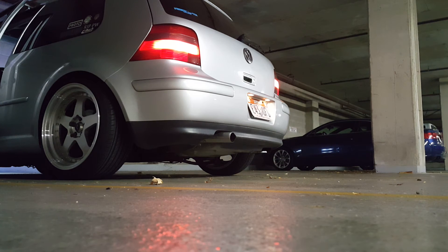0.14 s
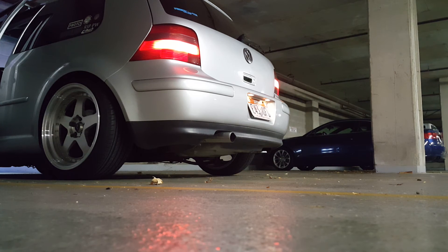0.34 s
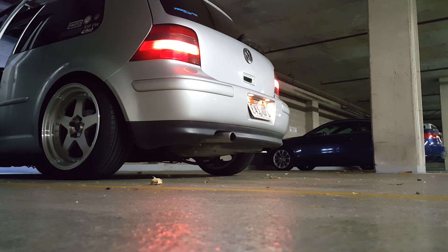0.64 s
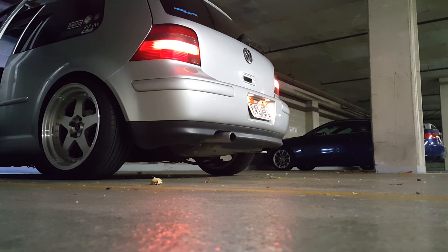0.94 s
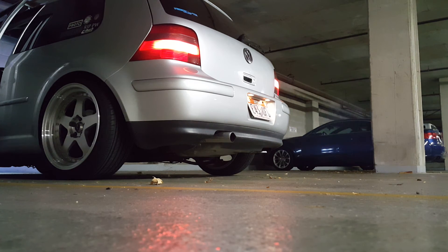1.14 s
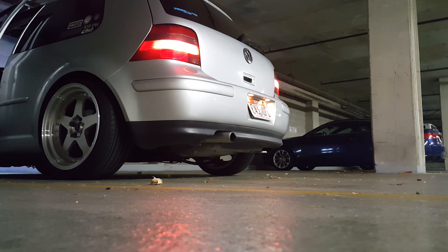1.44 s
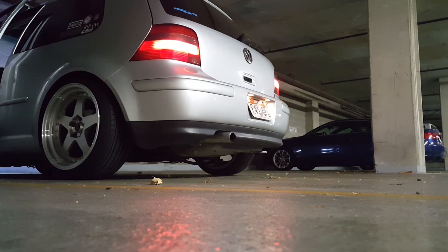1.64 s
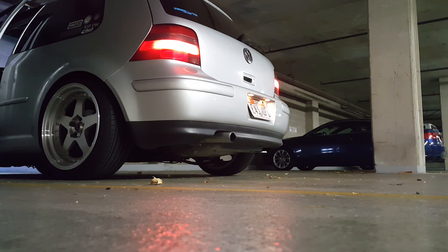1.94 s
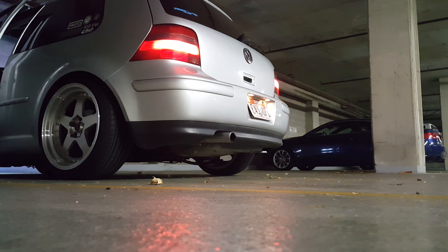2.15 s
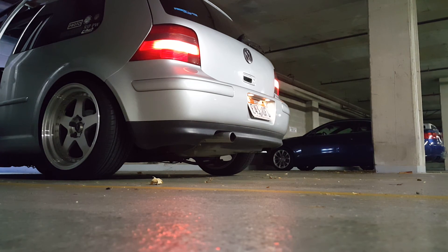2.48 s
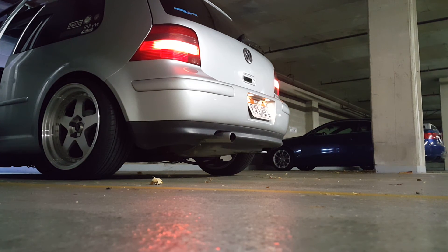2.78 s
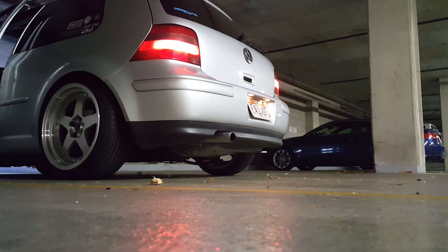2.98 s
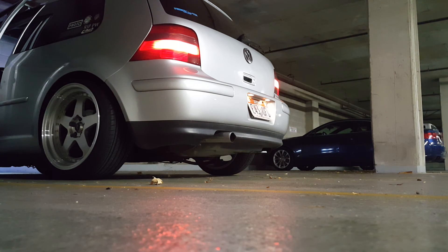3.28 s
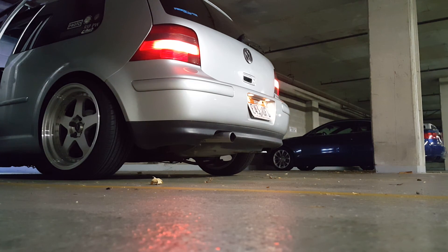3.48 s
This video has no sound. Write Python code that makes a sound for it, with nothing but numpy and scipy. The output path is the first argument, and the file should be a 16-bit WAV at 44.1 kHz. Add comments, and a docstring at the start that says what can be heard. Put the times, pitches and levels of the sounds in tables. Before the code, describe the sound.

Rumbling car exhaust with one quick rev and a falling turbo whistle in a concrete garage.

```python
"""A turbocharged four-cylinder car, blipped in a concrete parking garage, the microphone low behind
its tailpipe. Every firing booms through the pipe and puffs out gas; on throttle the puffs turn into
hard cracks, and now and then unburnt fuel pops. The turbo's breathy whistle spins up with the big
blip and winds down slowly. The hall answers with a long low tail, over a steady rush of its own."""
import sys
import numpy as np
from scipy import signal
from scipy.fft import rfft, irfft, next_fast_len
from scipy.io import wavfile
from scipy.ndimage import map_coordinates

SR = 44100
rng = np.random.default_rng(int(sys.argv[2]) if len(sys.argv) > 2 else 0)


def generate_wav(signal):
    """Clip the signal to [-1, 1] and save it as 16-bit WAV at the path in sys.argv[1]."""
    frames = np.transpose(np.atleast_2d(signal))
    scaled = np.clip(frames, -1, 1) * 32767
    pcm = np.round(scaled).astype(np.int16)
    wavfile.write(sys.argv[1], SR, pcm)


N = 159642

# Engine speed. Each row: time in seconds, firings per second.
FIRING_RATE = [(0.0, 49.79), (0.1, 47.05), (0.24, 46.47), (0.42, 42.41), (0.66, 39.92), (0.79, 38.42),
               (0.87, 42.67), (0.97, 56.76), (1.08, 75.87), (1.15, 88.1), (1.21, 89.48), (1.46, 77.46),
               (1.75, 62.95), (2.07, 48.95), (2.33, 43.97), (2.43, 46.91), (2.63, 48.28), (2.88, 43.5),
               (3.15, 38.5), (3.4, 35.3), (3.62, 34.6)]
# The drone. Each row: time in seconds, then dB before trim for harmonics 1 to 4 of the firing rate.
HARMONIC_LEVELS = [(0.0, -31, -28, -31, -36), (0.18, -32, -10, -23, -29), (0.3, -37, -20, -27, -27),
                   (0.42, -40, -14, -34, -24), (0.65, -41, -19, -27, -17), (0.71, -41, -27, -27, -27),
                   (0.83, -41, -28, -27, -23), (0.89, -42, -12, -26, -23), (0.95, -33, -17, -13, -27),
                   (1.01, -25, -30, -23, -23), (1.13, -23, -12, -18, -20), (1.25, -15, -21, -27, -33),
                   (1.42, -30, -14, -26, -30), (1.6, -26, -23, -30, -32), (1.72, -36, -39, -37, -30),
                   (1.96, -25, -20, -22, -27), (2.02, -29, -16, -18, -37), (2.26, -37, -17, -30, -25),
                   (2.37, -37, -19, -23, -33), (2.43, -34, -13, -17, -23), (2.55, -33, -22, -33, -29),
                   (2.61, -39, -11, -15, -22), (2.91, -39, -15, -31, -26), (3.2, -43, -37, -37, -27),
                   (3.44, -41, -29, -26, -20), (3.62, -42, -27, -24, -28)]
# Trim in dB for each harmonic.
HARMONIC_TRIMS = [-6.5, 0.37, -1, -1]
# Strength in dB of each cylinder.
CYLINDER_DB = [0.85, 0.48, 1.5, -1.8]
# Exhaust flow. Each row: time in seconds, rumble in dB, rasp in dB.
EXHAUST_LEVELS = [(0, -18.5, -25), (.25, -21, -29), (.55, -17, -28.5), (.82, -16.5, -32),
                  (.92, -13.5, -22.5), (1.12, -19.5, -31.5), (1.26, -19.5, -27), (1.5, -22, -27.5),
                  (1.72, -24, -29.5), (1.95, -19.5, -26), (2.3, -18.5, -29.5), (2.58, -14.5, -25.5),
                  (2.72, -18, -30.5), (3.02, -18.5, -32.5), (3.2, -24.5, -33.5), (3.62, -18.5, -33)]
# The turbo. Each row: time in seconds, pitch in Hz, dB before the pipe, width as a share of pitch.
WHISTLE_PATH = [(0, 5150, -35.5, 0.078), (.2, 4596, -34.5, 0.08), (.4, 4187, -37, 0.09),
                (.62, 3800, -34, 0.061), (.8, 3527, -52.5, 0.053), (.9, 3750, -35, 0.28),
                (1.02, 5155, -32, .17), (1.16, 7320, -29.5, 0.13), (1.26, 8600, -45, 0.1),
                (1.5, 7970, -43, 0.15), (1.7, 7040, -48, .07), (1.9, 6330, -38, 0.035),
                (2.15, 5376, -43.5, 0.043), (2.4, 4636, -36, 0.041), (2.6, 4600, -36, 0.095),
                (2.88, 4080, -38.5, .08), (3.02, 3880, -39.5, 0.044), (3.2, 3503, -55, 0.047),
                (3.45, 3100, -38, .035), (3.62, 2900, -42, .035)]
# What the pipe passes of the whistle. Each row: frequency in Hz, gain in dB.
PIPE_GAIN = [(1500, -14.5), (2800, 6), (3080, 6), (3400, -3), (3850, 1.5), (4250, -8), (4700, -3.5),
             (5600, -16), (6400, -9.5), (7300, -11), (8300, -12), (10000, -14.5), (13000, -25.5)]
# Fuel pops. Each row: start in seconds, level in dB, ring in Hz, ring boost in dB.
FUEL_POPS = [(.027, -21, 1300, 13.5), (.232, -23.5, 2900, 10.5), (1.188, -23.5, 12600, 23.5),
             (2.563, -10.5, 550, 17.5), (2.605, -14, 1300, 11)]
# Throttle openings. Each row: start and end in seconds, crack level at each in dB.
THROTTLE_BLIPS = [(0.882, 1.077, -20, -17), (1.11, 1.193, -20.5, -22.5), (2.437, 2.458, -26.5, -29.5),
                  (2.538, 2.594, -26, -30)]
# Tone colours. Each row: frequency in Hz, relative level in dB.
RUMBLE_SPECTRUM = [(20, -32.5), (42, -46.5), (54, -6.5), (70, -8.5), (90, -3.5), (118, -5), (145, -1),
                   (175, 1.5), (205, -5), (235, -1), (285, -7), (340, -3), (380, -17), (415, -10.5),
                   (470, -18), (530, -12.5), (700, -28), (1500, -54), (4000, -92)]
RASP_SPECTRUM = [(100, -19), (350, -1), (550, 0.5), (750, 1), (1050, -1), (1400, -1.5), (1800, -9),
                 (2300, -11.5), (2900, -11.5), (3400, -22), (4000, -18.5), (4900, -24.5), (5800, -37),
                 (8500, -44), (10500, -62), (16000, -62.5)]
ROOM_SPECTRUM = [(20, -8), (60, -2), (300, 3.5), (2000, -35.5), (5500, -36), (8700, -32.5), (10500, -45),
                 (15500, -47.5)]
CRACK_SPECTRUM = [(100, -25), (400, 3), (570, 8), (720, 4.5), (950, 1), (1350, 6.5), (1750, -3.5),
                  (2100, -2), (3100, -2), (4200, -10), (5300, -13), (6500, -24), (8500, -28.5),
                  (10200, -43.5), (15500, -46)]
# The hall's decay. Each row: frequency in Hz, seconds to fall 60 dB.
HALL_DECAY = [(100, 2.1), (1000, 0.65), (4000, 0.36), (10000, 0.87)]
# Placing of rumble, rasp, cracks, pops and turbo. Each row: hall send in dB, side trim in dB.
PLACEMENT = [(0.5, 2), (2.5, -0.5), (-3.5, -5.5), (-10.5, -10.5), (-8, -4.5)]
# Width at the microphone. Each row: frequency in Hz, side gain in dB.
SIDE_GAIN = [(60, -20.5), (125, -24), (250, -15), (500, -7.5), (1000, 0), (2000, -0.5), (4000, -6.5),
             (8000, 0.5), (14000, 3.5)]
# Balance at the microphone. Each row: frequency in Hz, left over right in dB.
LEFT_OVER_RIGHT = [(60, -4.5), (110, 1), (210, -1), (400, -1), (750, -1), (1410, 2.5), (2660, -0.5),
                   (5000, -2.0), (9400, 3)]


def amp(db):
    """Decibels to gain."""
    return 10 ** (np.asarray(db) / 20)


def unit(x):
    """Scale to rms 1."""
    return x / np.sqrt(np.mean(x ** 2) + 1e-20)


def along(points, hz):
    """Read (Hz, value) points on a log axis."""
    freqs, values = np.transpose(points)
    return np.interp(np.log(hz + 1), np.log(freqs + 1), values)


def curves(rows):
    """One value per sample for each column after the time."""
    times, *columns = np.transpose(rows)
    return [np.interp(np.arange(N) / SR, times, column) for column in columns]


def wobble(rate):
    """A smooth random curve, rate knots a second."""
    return map_coordinates(rng.standard_normal(int(N * rate / SR) + 4), [np.arange(N) * rate / SR])


def noise():
    """Two unrelated white noises."""
    return rng.standard_normal((2, N))


def filtered(x, response):
    """Apply a gain given as a function of Hz."""
    size = next_fast_len(N + SR // 2)
    return irfft(rfft(x, size) * response(np.fft.rfftfreq(size, 1 / SR)), size)[..., :N]


def coloured(x, spectrum, size=16384):
    """Minimum-phase filter with the given spectrum."""
    cepstrum = irfft(np.log(amp(along(spectrum, np.fft.rfftfreq(size, 1 / SR)))))
    cepstrum[1:size // 2] *= 2
    cepstrum[size // 2 + 1:] = 0
    impulse = irfft(np.exp(rfft(cepstrum)))
    return signal.fftconvolve(x, impulse[None], axes=1)[:, :N]


def puffs(firings, rate, attack_s, decay_s, steady, scatter_db):
    """Envelope of the gas flow: one uneven puff per firing over a steady stream."""
    age = (firings % 1) / rate
    index = firings.astype(int)
    size_db = np.take(CYLINDER_DB, index % len(CYLINDER_DB)) + scatter_db * rng.standard_normal(SR)[index]
    pulses = amp(size_db) * (1 - np.exp(-age / attack_s)) * np.exp(-age / decay_s)
    return unit(unit(pulses) + steady)


def drone(firings):
    """Low harmonics of the firing rate, each swelling and fading along its own level curve."""
    tone = np.zeros(N)
    for harmonic, (level_db, trim_db) in enumerate(zip(curves(HARMONIC_LEVELS), HARMONIC_TRIMS), 1):
        rms = amp(level_db + trim_db + 1.83 * wobble(23))
        phase = 2 * np.pi * harmonic * (firings - .08) + wobble(11) / 10
        tone -= np.sqrt(2) * rms * np.cos(phase)
    return np.array([tone, tone])


def rumble(firings, rate, level_db, rough=0.72, scatter_db=4.5):
    """One uneven pressure pulse per firing, with turbulence behind it, booms in the silencer."""
    kicks = np.diff(np.floor(firings), prepend=0) * amp(scatter_db * noise())
    flow = puffs(firings, rate, attack_s=0.00027, decay_s=0.0057, steady=0.076, scatter_db=1.5)
    pressure = unit(kicks / np.sqrt(rate)) + rough * unit(flow * noise())
    return amp(level_db) * unit(coloured(pressure, RUMBLE_SPECTRUM))


def rasp(firings, rate, level_db):
    """Gas rushes out of the tailpipe in time with the firings."""
    flow = puffs(firings, rate, attack_s=0.00045, decay_s=0.0051, steady=0.99, scatter_db=3)
    return amp(level_db) * unit(coloured(flow * noise(), RASP_SPECTRUM))


def turbo(firings, rate, core=.7, skirt=2.0, skirt_db=-7, sweep=2.0):
    """A noise band on the turbine's speed; each firing kicks up its pitch and level, then both sag."""
    pitch, level_db, width = curves(WHISTLE_PATH)
    kick = np.minimum(sweep * width, .14) * (.5 - firings % 1)
    phase = 2 * np.pi * np.cumsum(pitch * (1 + kick)) / SR

    def band(share):
        """Noise around the whistle, this share of its pitch wide."""
        knots = np.cumsum(share * pitch) * 2 / SR
        i, q = [map_coordinates(row, [knots], order=1) for row in noise()]
        return unit(i * np.cos(phase) + q * np.sin(phase))
    whistle = np.array([band(core * width) + amp(skirt_db) * band(skirt * width) for _ in range(2)])
    flow = puffs(firings, rate, attack_s=0.0009, decay_s=0.0085, steady=0.96, scatter_db=4.5)
    return filtered(amp(level_db) * flow * whistle, lambda hz: amp(along(PIPE_GAIN, hz)))


def room_tone(level_db=-38):
    """The steady low rush and faint hiss of the garage."""
    return amp(level_db) * unit(coloured(noise(), ROOM_SPECTRUM))


def pops(decay_s=.006, ring_share=.25):
    """Unburnt fuel goes off in single bangs, each with a ring of its own."""
    t, out = np.arange(N) / SR, np.zeros((2, N))
    for start, level_db, ring_hz, ring_db in FUEL_POPS:
        boost_db = lambda hz: ring_db / (1 + ((hz / ring_hz - 1) / ring_share) ** 2)
        bang = unit(filtered(noise(), lambda hz: amp(along(CRACK_SPECTRUM, hz) + boost_db(hz))))
        envelope = (t > start) * np.exp(-np.abs(t - start) / decay_s)
        out += amp(level_db) * envelope * bang
    return out


def cracks(firings, rate, rise_s=0.037, release_s=0.0073):
    """With the throttle open each firing leaves the pipe as a sharp crack."""
    t, load = np.arange(N) / SR, np.zeros(N)
    for start, end, start_db, end_db in THROTTLE_BLIPS:
        gate = np.exp(-np.maximum(start - t, 0) / rise_s - np.maximum(t - end, 0) / release_s)
        load += gate * amp(np.interp(t, [start, end], [start_db, end_db]))
    bursts = puffs(firings, rate, attack_s=0.0018, decay_s=0.0017, steady=0.079, scatter_db=-2.5)
    return load * unit(coloured(bursts * noise(), CRACK_SPECTRUM))


def garage(layers):
    """Each layer reaches the microphone directly and as a tail off the concrete."""
    hz, t, spectra = signal.stft(rng.standard_normal((2, SR)), SR, nperseg=256)
    decay = amp(-60 * t / along(HALL_DECAY, hz)[:, None])
    tail = signal.istft(spectra * decay, SR, nperseg=256)[1]
    tail /= np.sqrt(np.mean(np.abs(rfft(tail))[:, :SR // 10] ** 2))
    direct = send = 0
    for layer, (send_db, side_db) in zip(layers, PLACEMENT):
        placed = layer * amp([[0], [side_db]]) / np.hypot(1, amp(send_db))
        direct += placed
        send += placed * amp(send_db)
    lead_in = np.pad(send, ((0, 0), (SR // 2, 0)), mode="reflect")  # the hall is already ringing
    return direct + signal.fftconvolve(lead_in, tail, axes=1)[:, SR // 2:][:, :N]


def spread(pair):
    """Middle and side become left and right."""
    side = filtered(pair[1], lambda hz: amp(along(SIDE_GAIN, hz)))
    return np.array([pair[0] + side, pair[0] - side])


def scene():
    """The car and the hall from behind the tailpipe, in stereo."""
    rate, = curves(FIRING_RATE)
    firings = np.cumsum(rate) / SR  # running count
    rumble_db, rasp_db = curves(EXHAUST_LEVELS)
    car = garage([rumble(firings, rate, rumble_db), rasp(firings, rate, rasp_db),
                  cracks(firings, rate), pops(), turbo(firings, rate)])
    mix = drone(firings) + spread(car + room_tone())
    return filtered(mix, lambda hz: amp(np.outer([.5, -.5], along(LEFT_OVER_RIGHT, hz))))


def record(dry):
    """Peaks are rounded off near full scale; nothing is kept above 15.8 kHz."""
    rounded = dry / (1 + np.abs(dry) ** 6) ** (1 / 6)
    return filtered(rounded, lambda hz: hz < 15800)


dry = scene()
out = record(dry)
generate_wav(out)
```